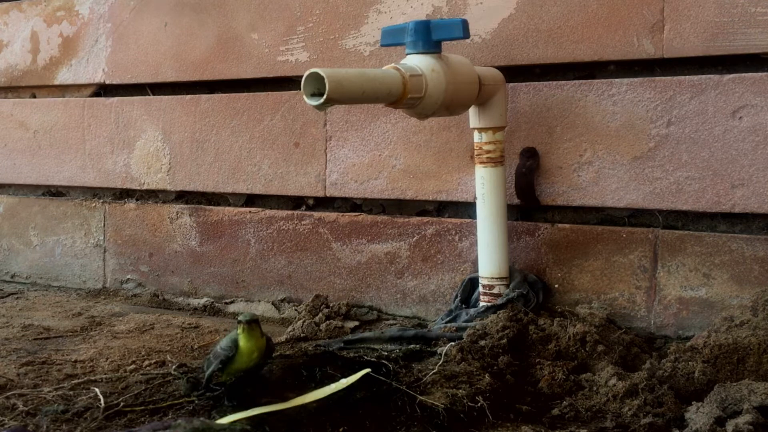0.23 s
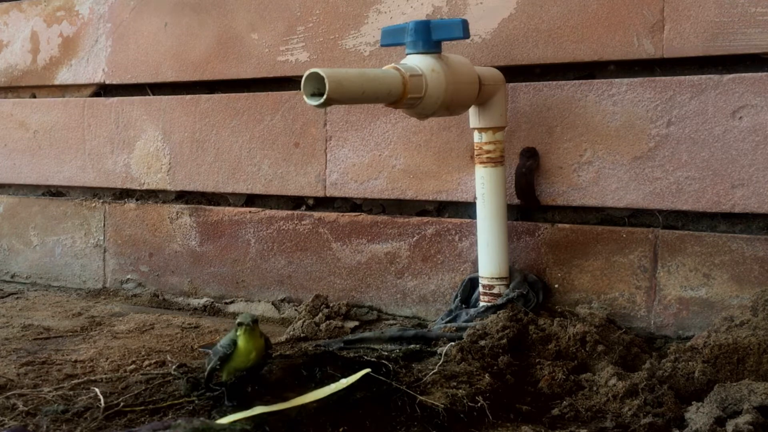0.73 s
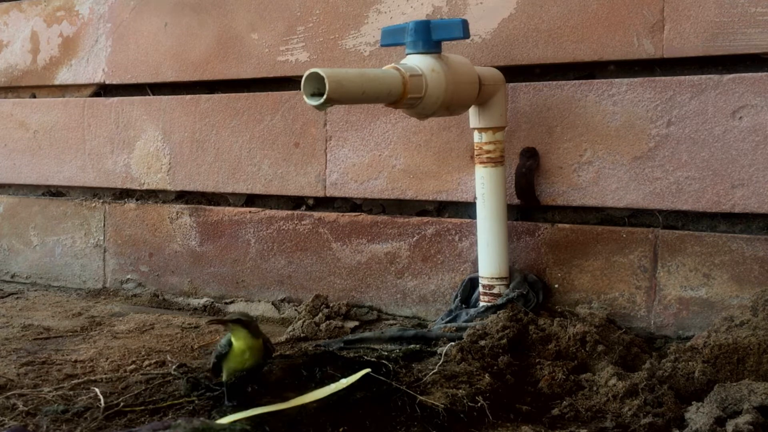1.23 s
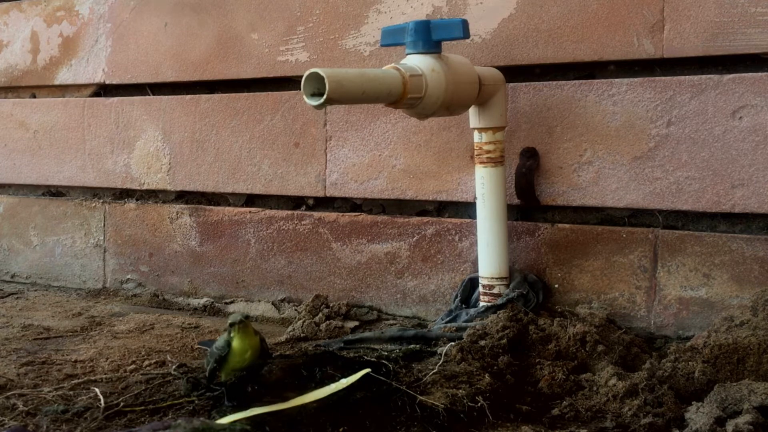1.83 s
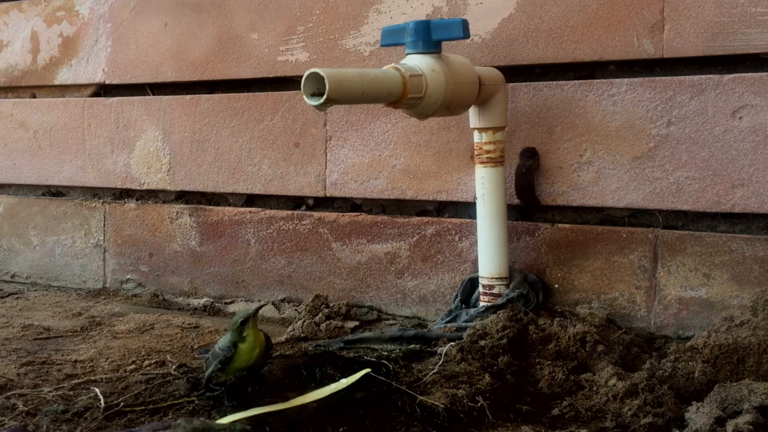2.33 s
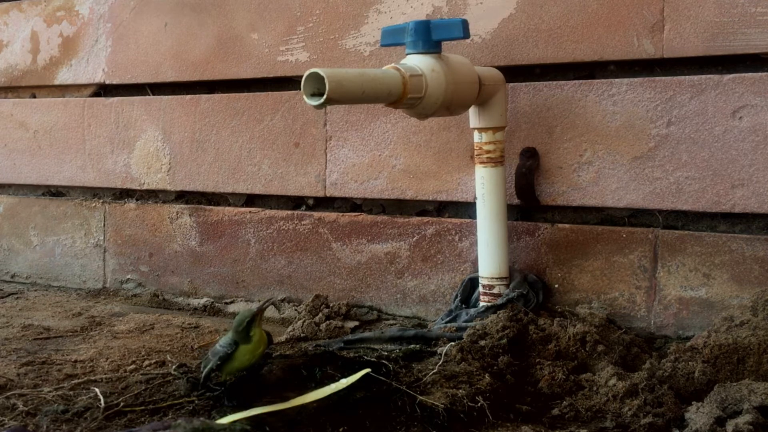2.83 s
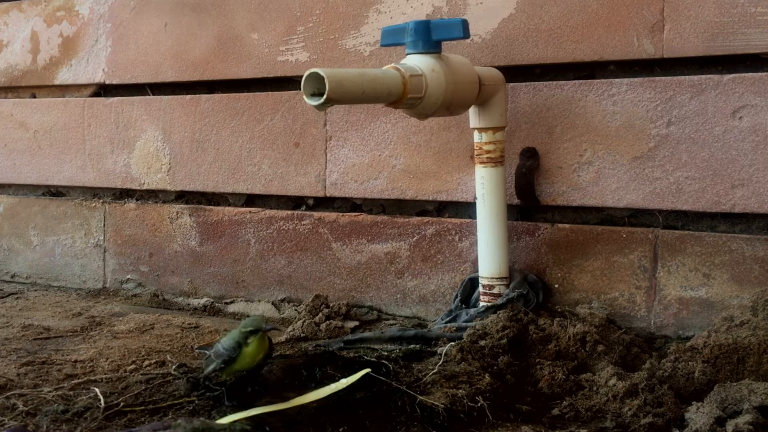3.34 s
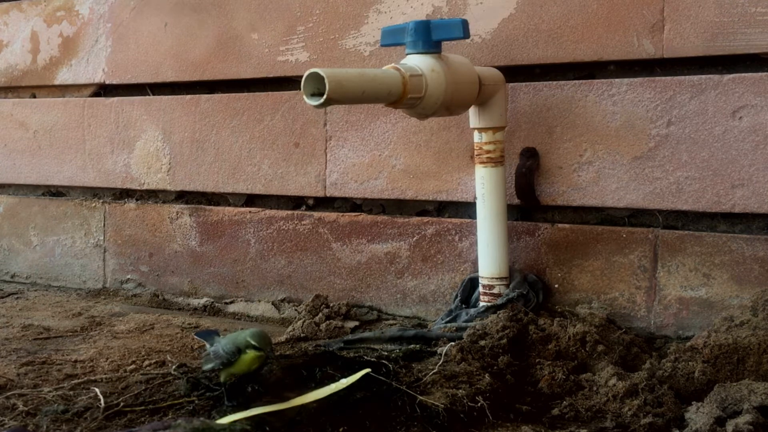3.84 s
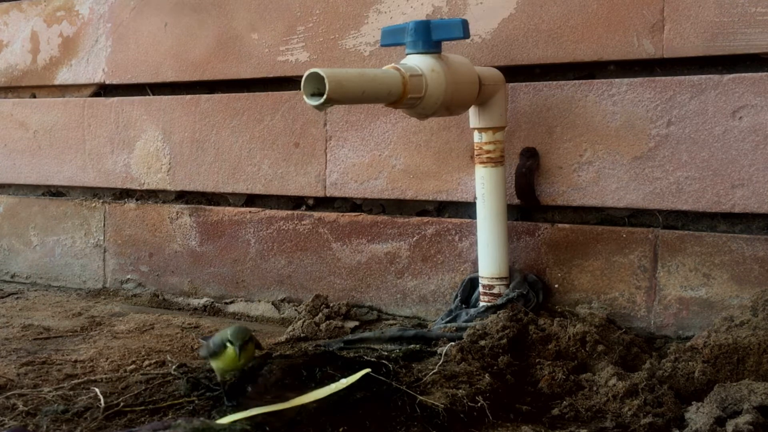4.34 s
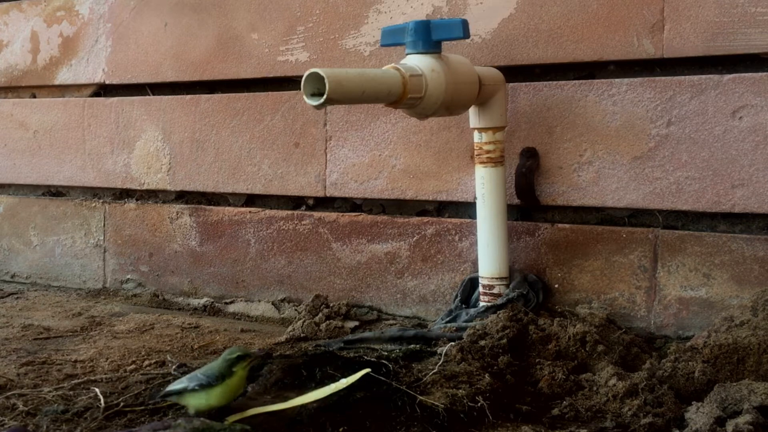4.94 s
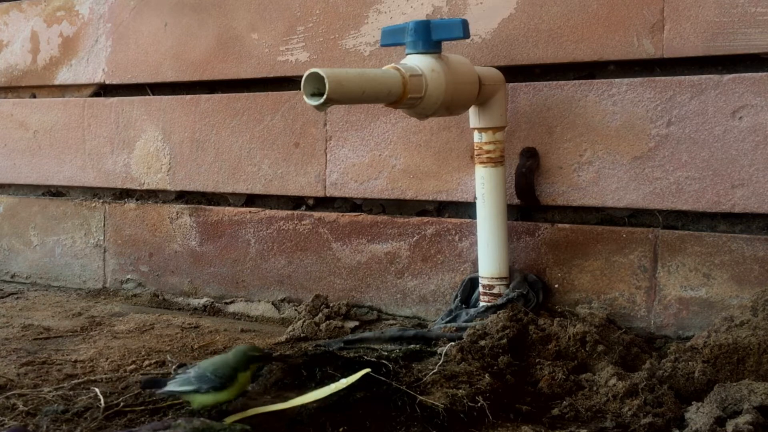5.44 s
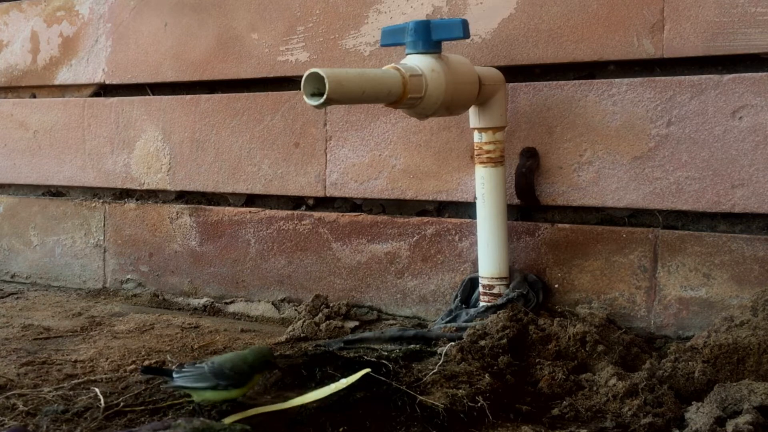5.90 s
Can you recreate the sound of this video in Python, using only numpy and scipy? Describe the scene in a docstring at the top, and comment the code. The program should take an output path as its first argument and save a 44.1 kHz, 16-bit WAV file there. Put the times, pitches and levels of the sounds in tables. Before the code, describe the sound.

A small bird gives a few short, high whistles and chips close by, over the low rumble of distant traffic.

```python
"""Far traffic rumbles throughout as a sunbird calls close by, on the ground beside a brick wall.
An arched whistle opens the scene; a clipped chip and two more whistles follow, each starting with
a rasp as the bird's membrane rattles before it locks on a pitch. After a faint rustle and a faint
tone come a soft rising squeal (3.5 s), a thin flickering tone near 10 kHz, a last whistle and a chip.
Throat and beak filter the calls, and the yard answers with a short echo."""
import sys
import numpy as np
from scipy import signal
from scipy.fft import rfft, irfft
from scipy.io import wavfile

SR = 44100
rng = np.random.default_rng(int(sys.argv[2]) if len(sys.argv) > 2 else 0)


def int16_out(signal):
    """Quantize to a 16-bit WAV file."""
    q = np.round(np.clip(np.atleast_2d(signal).T, -1, 1) * 32767)
    wavfile.write(sys.argv[1], SR, q.astype(np.int16))


N = 272086


def gain_of(db):
    """Amplitude ratio of a level in decibels."""
    return 10 ** (np.asarray(db) / 20)


def unit_rms(x):
    """Normalisation to rms 1."""
    return x / np.sqrt(np.mean(x ** 2) + 1e-20)


def curve_at(points, hz):
    """Interpolation of a table on a log-frequency axis."""
    f, value = np.transpose(points)
    return np.interp(np.log(hz + 1), np.log(f + 1), value)


def add(mix, start_s, sound):
    """Superposition: a sound joins the mix at its start time."""
    start = round(start_s * SR)
    sound = sound[max(-start, 0):]
    part = mix[max(start, 0):][:len(sound)]
    part += sound[:len(part)]


def bump(t, at, width):
    """Gaussian pulse of height 1."""
    return np.exp(-((t - at) / width) ** 2)


def wander(size, hz):
    """Low-pass noise: random motion of rms near 1, no faster than about hz."""
    padded = size + SR // 4
    lowpass = bump(np.fft.rfftfreq(padded, 1 / SR), 0, hz)
    return unit_rms(irfft(rfft(rng.standard_normal(padded)) * lowpass))[:size]


def noise(colour, size):
    """Spectral shaping: white noise filtered to the given colour, at rms 1."""
    response = gain_of(curve_at(colour, np.fft.rfftfreq(size, 1 / SR)))
    return unit_rms(irfft(rfft(rng.standard_normal(size)) * response, size))


def traffic(rumble_db=-46, swell_scale=.55):
    """Broadband road noise swells under engine tones whose frequency rises with speed."""
    # road spectrum: (frequency [Hz], relative level [dB])
    rumble = [(19, -42.5), (32, -16.5), (57, -2), (79, -4), (105, -7), (126, -11.5), (296, -21),
              (425, -26.5), (472, -33.5), (565, -32.5), (751, -39.5), (1630, -44.5), (4970, -55.5),
              (9980, -59.5), (15500, -60)]
    # swell contour, before centring and scaling: (time [s], level [dB])
    swell = [(0.0, -54), (0.43, -48.5), (1.6, -51.5), (4.07, -48), (4.28, -46.5), (4.47, -46.5),
             (5.19, -48.5), (5.22, -49.5), (6.17, -47.5)]
    # far engines: (start [s], peak [s], end [s], first pitch [Hz], climb [Hz/s], peak level [dB],
    # start re peak [dB], end re peak [dB])
    engines = [(0, 2.14, 2.8, 69.7, 2.8, -44, -3.5, -4), (0, .45, 1.1, 92.6, 7.8, -45.5, -12.5, -10),
               (2.199, 2.4, 2.86, 209.2, 28.2, -57.5, -3.5, -10),
               (2.6, 3.65, 3.85, 151.7, 20, -52.5, -3.5, -2.5), (3.1, 2.4, 9.4, 47, 4.6, -45, -3.5, -19),
               (4, 4.3, 4.64, 92.4, 10.6, -42, -13.5, -28), (4, 4.7, 5.3, 179.6, 24, -58, -8.5, -9),
               (4.799, 5.1, 5.44, 105, 5, -47, -15.5, -15)]
    times, contour_db = np.transpose(swell)
    swell_db = swell_scale * np.interp(np.arange(N) / SR, times, contour_db - contour_db.mean())
    out = noise(rumble, N) * gain_of(rumble_db + swell_db)
    for start, peak, end, first_hz, climb, top_db, first_db, last_db in engines:
        t = np.arange(start, end, 1 / SR)
        hz = (first_hz + climb * (t - start)) * (1 + .02 * wander(len(t), 24))
        tone = np.sqrt(2) * np.sin(2 * np.pi * np.cumsum(hz) / SR)
        db = top_db + np.interp(t, [start, peak, end], [first_db, 0, last_db])
        db += 1.7 * wander(len(t), 8.7)
        add(out, start, gain_of(db) * tone * signal.windows.tukey(len(t), .05))
    return out


def syrinx(t, hz, effort_db, rough, quaver, beak, harmonics, hiss_db, waver_db, drift,
           split=0, swing=.015, flutter=.15, chaos=.14, sway=.005, quaver_hz=136.8):
    """Source and filter: a vibrating membrane's harmonics pass the resonances of throat and beak."""
    size = len(t)
    # the quaver modulates pitch (swing) and amplitude (flutter); roughness jitters the cycles
    shake = quaver * np.sin(2 * np.pi * np.cumsum(quaver_hz * (1 + .47 * wander(size, 60))) / SR)
    unsteadiness = drift * wander(size, 250) + sway * wander(size, 40)
    jitter = chaos * rough * wander(size, 1500)
    pitch = hz * (1 + swing * shake + unsteadiness + jitter)
    phase = 2 * np.pi * np.cumsum(pitch) / SR
    tone = sum(gain_of(db) * np.clip((SR / 2 - k * pitch) / 3000, 0, 1) * np.sin(k * phase)
               for k, db in enumerate(harmonics, 1))
    # period doubling: alternate strong and weak cycles put lines halfway between the harmonics
    tone *= 1 + split * rough * np.cos(phase / 2)
    hiss = gain_of(hiss_db) * rough * rng.standard_normal(size)
    strength = gain_of(effort_db + waver_db * wander(size, 150)) * (1 + flutter * shake)
    fade = np.clip(np.minimum(t - t[0], t[-1] - t) / .004, 0, 1)
    source = fade * strength * (np.sqrt(2) * tone + hiss)
    resonances = gain_of(curve_at(beak, np.fft.rfftfreq(2 * size, 1 / SR)))
    return irfft(rfft(source, 2 * size) * resonances)[:size]


def whistles(low_hz=2100, lead_s=.03, swept_s=.011, snap_s=.003, catch_db=-9):
    """Onset of periodic oscillation: a rough upward sweep locks into an arched whistle."""
    # full calls: (lock time [s], length [s], top pitch [Hz], arch exponent, effort [dB],
    # loss by the end [dB], rise time [s], sweep re effort [dB], roughness [0-1], quaver [0-1],
    # overtone lift [dB], wall reflection [0-1])
    calls = [(-.143, .25, 6690, 2.75, -19.5, 3, .002, -4, .8, 0.51, -0.5, 0),
             (1.392, .256, 6566, 2.28, -17.5, 3.5, .001, -5.5, 0.73, 0.4, -2, 0.26),
             (2.893, 0.25, 6564, 2.19, -18, 7, .001, -5.5, 0.7, 0.17, 0.5, .09),
             (4.913, .244, 6506, 2.22, -19, 5, .018, -4, 0.2, .6, 3, 0.63)]
    # response of throat and open beak: (frequency [Hz], gain [dB])
    open_beak = [(1800, -25.5), (2500, -25), (3300, -31), (4300, -19.5), (5050, -27), (5550, -2.5),
                 (6000, -1), (6700, 2.5), (8600, -6), (10300, -17.5), (11400, -31), (12200, -15),
                 (13100, -13.5), (15800, -18.5)]
    # membrane harmonics from the first up: (level [dB])
    harmonics = [-2.5, -15, -24.5, -25.5, -30.5, -33.5, -34, -36.5]
    out = np.zeros(N)
    for (start, length, top_hz, exponent, effort_db, lost_db, rise_s, sweep_db,
         opening_rough, quaver, lift_db, reflection) in calls:
        t = np.arange(-lead_s, length, 1 / SR)
        progress = np.maximum(t, 0) / length
        # the pitch dips as it locks, sags along an arch and drops off at the end
        dip = bump(t, at=.005, width=.012)
        arch = np.sin(1.36 * progress ** exponent) ** 2
        ending = np.exp((t - length) / .0051)
        whistle_hz = top_hz * (1 - .068 * dip) * (1 - .228 * arch) * (1 - .27 * ending)
        hz = low_hz + (whistle_hz - low_hz) * np.exp(np.minimum(t, 0) / .0105)
        # the sweep gains strength, catches, then snaps to full effort
        attack_db = np.interp(t, [-lead_s, -swept_s, -snap_s, rise_s - snap_s, rise_s],
                              [sweep_db - 11, sweep_db, catch_db, catch_db, 0])
        level_db = effort_db + attack_db - lost_db * progress + .5 * ending
        rough = opening_rough / (1 + np.exp((t + swept_s) / .007)) + .22 * ending
        calming = 1 - .55 * progress
        lifted = [db + lift_db * (k > 0) for k, db in enumerate(harmonics)]
        call = syrinx(t, hz, level_db, rough, quaver * calming, open_beak, lifted,
                      hiss_db=-22, waver_db=.97, drift=.005, swing=.02, flutter=.38, sway=.004)
        add(out, start - lead_s, wall(call, reflection))
    return out


def wall(call, reflection, delay_s=.001008):
    """Comb filtering: the bounce cancels some pitches, so a small quaver becomes a deep flutter."""
    size = len(call) + 256
    delay = np.exp(-2j * np.pi * np.fft.rfftfreq(size, 1 / SR) * delay_s)
    return irfft(rfft(call, size) * (1 + reflection * delay), size)


def yard(x, early_db, tail_db, early_t60=.08):
    """Reverberation: early scatter from wall and ground, then a tail whose decay varies with frequency."""
    # reverberation time: (frequency [Hz], time to fall 60 dB [s])
    tail_t60 = [(1000, 0.54), (5500, 0.29), (9000, 0.099), (15000, 0.43)]
    size = SR // 2
    hz, frame_s, spectra = signal.stft(rng.standard_normal(size), SR, nperseg=256)
    decay = gain_of(-60 * frame_s / curve_at(tail_t60, hz)[:, None])
    t = np.arange(size) / SR
    tail = signal.istft(spectra * decay, SR, nperseg=256)[1][:size] * np.clip(t / .02, 0, 1)
    early = rng.standard_normal(size) * gain_of(-60 * t / early_t60) * (t > .002)
    echo = gain_of(early_db) * early / np.linalg.norm(early)
    echo += gain_of(tail_db) * tail / np.linalg.norm(tail)
    return signal.fftconvolve(x, echo)[:N]


def rasps(grain_db=2.5):
    """Aperiodic vibration: before it locks on a pitch the membrane rattles, harder and harder."""
    # call openings: (start [s], end [s], first level [dB], top level [dB], gain under 5.3 kHz [dB])
    openings = [(1.111, 1.151, -54, -53, 9), (1.362, 1.39, -41.5, -28, -3), (2.86, 2.891, -44.5, -28.5, -1),
                (3.501, 3.528, -51, -48, 17), (4.88, 4.915, -46, -32, 4.5), (6.06, 6.089, -58, -54.5, 7)]
    # rattle spectrum: (frequency [Hz], relative level [dB])
    spectrum = [(1200, -54.5), (1900, -22), (2590, -22.5), (3500, -26), (4290, -6.5), (5000, -21.5),
                (5700, 4.5), (7300, -2.5), (8800, 0.5), (10100, -15), (15500, -23)]
    out = np.zeros(N)
    for start, end, first_db, top_db, low_db in openings:
        t = np.arange(start, end + .0018, 1 / SR)
        level_db = np.interp(t, [start, start + .002, start + .71 * (end - start), end - .004, t[-1]],
                             [first_db - 11, first_db, top_db, top_db, top_db - 13.5])
        colour = [(hz, db + low_db * (hz < 5300)) for hz, db in spectrum]
        rattle = noise(colour, len(t)) * gain_of(grain_db * wander(len(t), 710))
        add(out, start, gain_of(level_db) * unit_rms(rattle))
    return out


def chips(low_hz=3850, lock_s=.032, clear_s=.033, glide_s=.003, release_s=.016):
    """Period doubling: a rough low note clears, jumps up to a whistle and is cut short."""
    # clipped calls: (start [s], length [s], whistle pitch [Hz], effort [dB])
    calls = [(1.111, .064, 5780, -42), (6.063, .063, 5910, -42.5)]
    # response of throat and beak: (frequency [Hz], gain [dB])
    beak = [(1500, -13.5), (2300, -16), (3100, -11), (4100, -6), (5800, -0.5), (7200, 0), (9200, -16),
            (10400, -28), (12300, -10), (15500, -19)]
    # membrane harmonics from the first up: (level [dB])
    harmonics = [0, -8.5, -19.5]
    out = np.zeros(N)
    for start, length, whistle_hz, effort_db in calls:
        t = np.arange(0, length, 1 / SR)
        locked = 1 / (1 + np.exp((lock_s - t) / glide_s))
        release = np.clip(1 - (length - t) / release_s, 0, 1)
        hz = low_hz + (whistle_hz - low_hz) * locked
        level_db = effort_db - 10 * (1 - locked) - 8 * release
        rough = .85 / (1 + np.exp((t - clear_s) / glide_s))
        quaver = .8 * np.sin(np.pi * (t / length) ** 2)
        call = syrinx(t, hz, level_db, rough, quaver, beak, harmonics,
                      hiss_db=-6.5, waver_db=3, drift=.012, split=1.7, swing=.08, flutter=.25, chaos=.11)
        add(out, start, call)
    return out


def rustles(edge_db=-26):
    """Band-limited noise under a smooth window makes soft, brief swishes."""
    # rustles: (start [s], length [s], centre frequency [Hz], level [dB])
    swishes = [(2.242, .22, 1950, -71.5), (4.735, .04, 9660, -73)]
    out = np.zeros(N)
    for start, length, hz, db in swishes:
        size = round(length * SR)
        colour = [(hz / 4, edge_db), (hz, 0), (hz * 4, edge_db)]
        add(out, start, gain_of(db) * noise(colour, size) * np.hanning(size))
    return out


def faint_tones(flicker_db=6):
    """Random modulation of frequency and amplitude makes faint, thin tones flicker."""
    # one tone near 3.4 kHz, then two near 10 kHz: (start [s], end [s], pitch [Hz], level [dB])
    notes = [(3.281, 3.481, 3380, -82), (4.09, 4.78, 10170, -83), (5.201, 5.5, 10170, -93)]
    out = np.zeros(N)
    for start, end, hz, db in notes:
        size = round((end - start) * SR)
        phase = 2 * np.pi * np.cumsum(hz + 70 * wander(size, 200)) / SR
        tone = unit_rms(np.sin(phase) * gain_of(flicker_db * wander(size, 32)))
        add(out, start, gain_of(db) * tone * signal.windows.tukey(size, .1))
    return out


def squeal(effort_db=-31.5, hold_s=.12, fade_db_per_s=144):
    """A glide through fixed resonances: it starts hoarse, cracks midway, fades at the top and slips."""
    # pitch contour: (time [s], pitch [Hz])
    glide = [(3.525, 1524), (3.537, 1725), (3.555, 1920), (3.571, 1952), (3.585, 2237), (3.603, 2447),
             (3.619, 2920), (3.657, 3361), (3.675, 4380), (3.691, 4628), (3.747, 4970), (3.788, 4990)]
    # response of throat and nearly shut beak: (frequency [Hz], gain [dB])
    shut_beak = [(1500, -39), (2100, -19), (3100, -23.5), (3800, -4), (5000, 1.5), (6200, -4),
                 (7500, -24.5), (9200, -11.5), (10500, -24.5), (15500, -11)]
    # membrane harmonics from the first up: (level [dB])
    harmonics = [-4, -10, -15.5, -18, -20, -24, -24, -23]
    times, pitches = np.transpose(glide)
    t = np.arange(times[0], times[-1], 1 / SR)
    onset = bump(t, at=t[0], width=.0082)
    crack = bump(t, at=3.634, width=.013)
    slip = 1 - .07 * np.exp((t - t[-1]) / .006)
    hz = np.interp(t, times, pitches) * slip
    fade_db = fade_db_per_s * np.maximum(t - t[0] - hold_s, 0)
    level_db = effort_db - 6 * onset - 13.5 * crack - fade_db
    rough = .13 * np.linspace(1, 0, len(t)) + .28 * onset + .21 * crack
    call = syrinx(t, hz, level_db, rough, quaver=.12, beak=shut_beak, harmonics=harmonics,
                  hiss_db=-14, waver_db=2.5, drift=.0041, chaos=.13)
    out = np.zeros(N)
    add(out, t[0], call)
    return out


def scene():
    """Direct and reverberant sound add; the soft calls arrive with a larger share of the yard."""
    full = whistles() + rasps()
    soft = chips() + squeal()
    echoes = yard(full, early_db=-18.5, tail_db=-31) + yard(soft, early_db=-10, tail_db=-18)
    return (full + soft + echoes + faint_tones() + rustles() + traffic())[None]


def record(dry, cutoff_hz=15850):
    """Band limiting: a linear-phase low-pass filter removes the highest treble."""
    lowpass = signal.firwin(511, cutoff_hz, window=("kaiser", 9), fs=SR)
    return signal.oaconvolve(dry, lowpass[None], "same")


dry = scene()
out = record(dry)
int16_out(out)
```